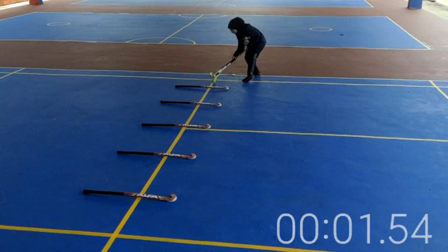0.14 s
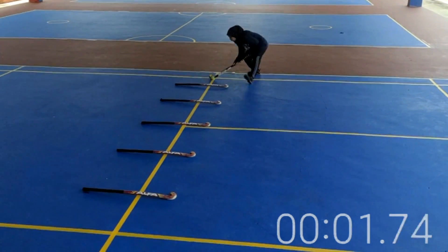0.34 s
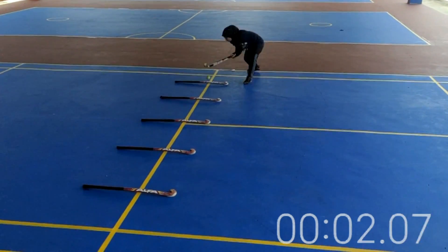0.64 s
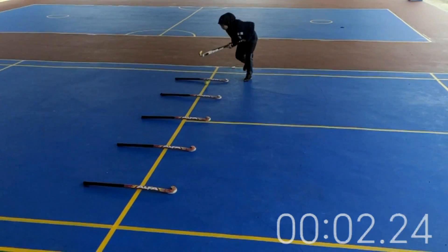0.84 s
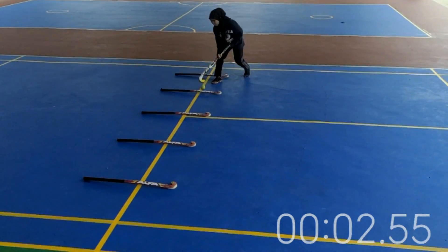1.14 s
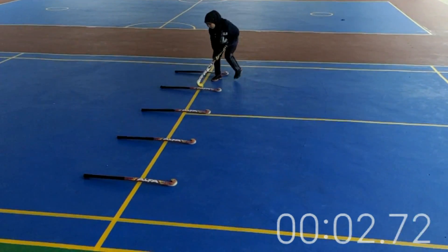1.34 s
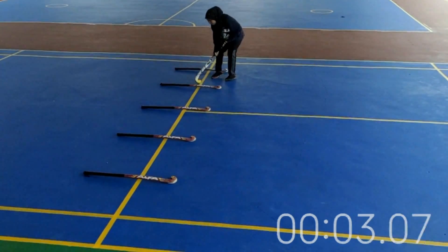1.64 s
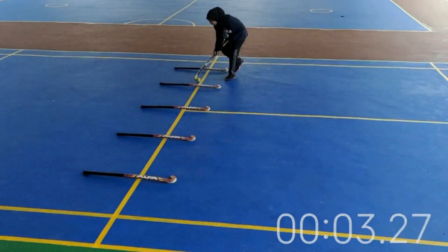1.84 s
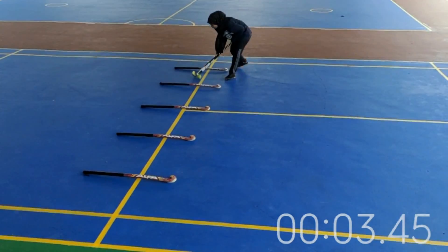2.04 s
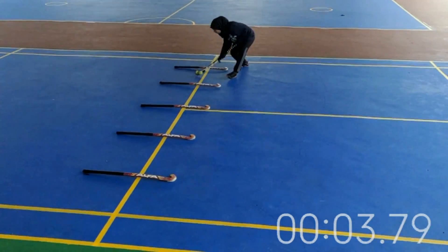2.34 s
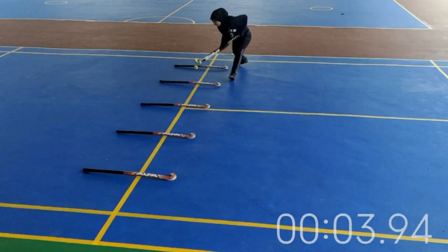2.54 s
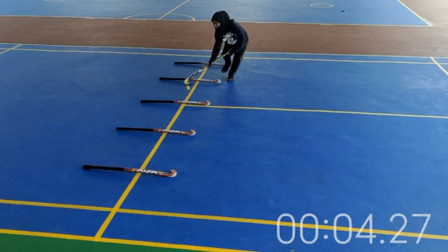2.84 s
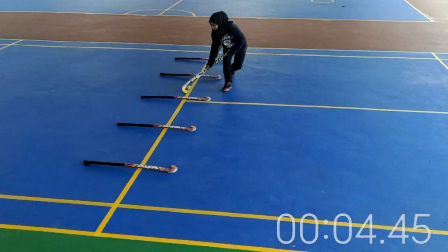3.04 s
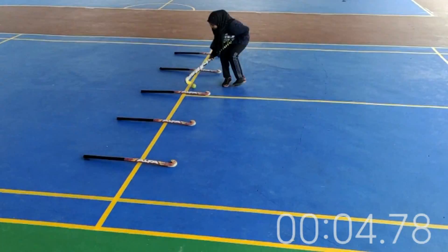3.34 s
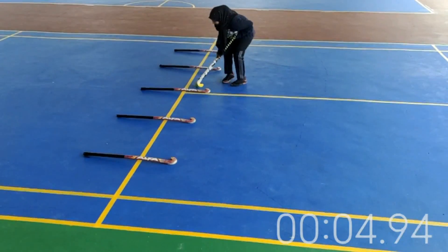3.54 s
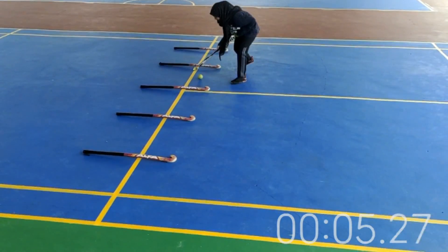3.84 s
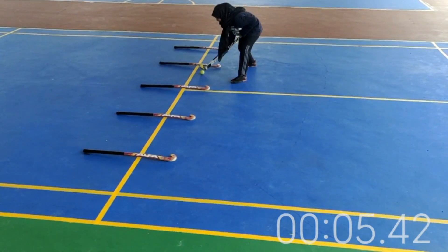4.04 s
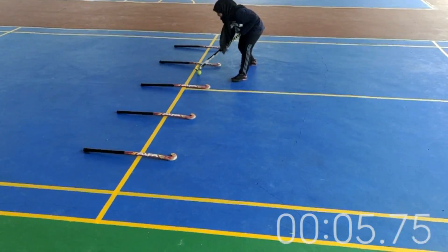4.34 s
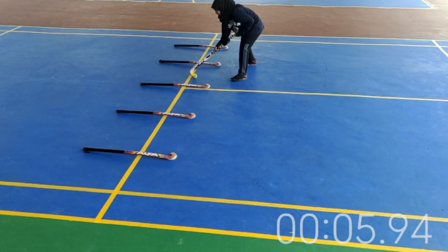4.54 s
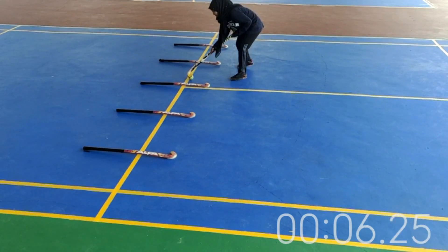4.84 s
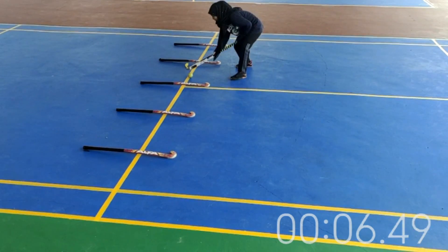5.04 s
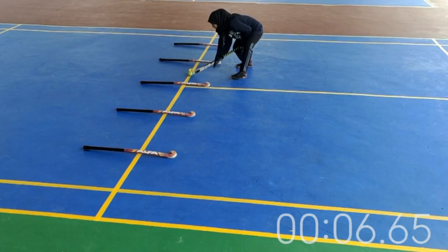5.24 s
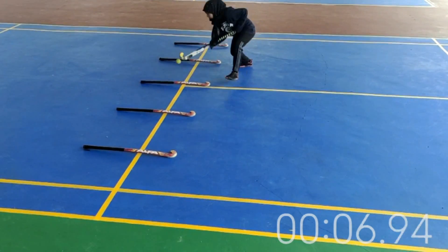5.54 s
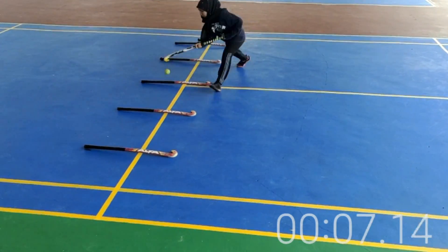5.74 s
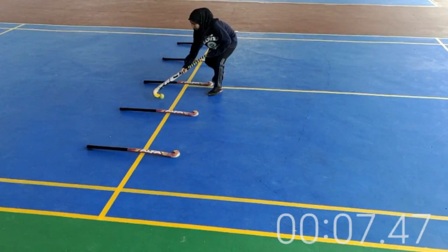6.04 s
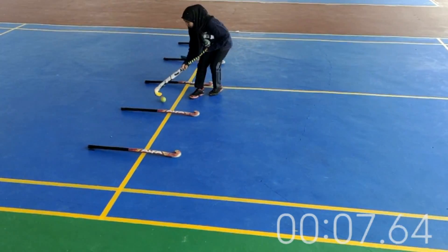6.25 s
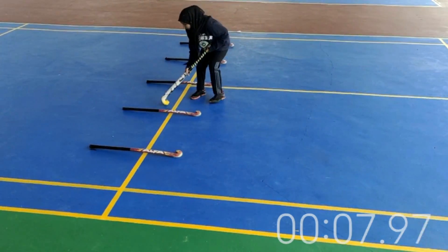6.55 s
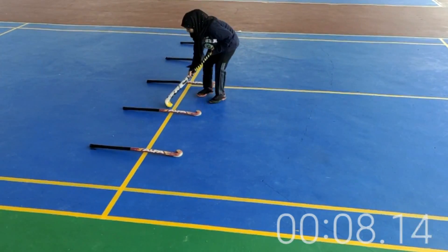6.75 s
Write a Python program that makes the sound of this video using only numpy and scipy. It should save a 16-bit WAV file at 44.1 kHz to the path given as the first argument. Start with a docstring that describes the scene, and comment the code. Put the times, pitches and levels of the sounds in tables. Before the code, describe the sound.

A hockey stick knocks a hard ball in uneven, ringing clacks over hollow thuds, echoing through a large hard-floored covered court with faint shoe squeaks.

```python
"""A hockey stick dribbles a hard ball across a covered court: ringing clacks over hollow thuds.
Each knock is a resonant spectrum turned into a causal ring, driven by a push and a few ms of chatter.
Knocks and footfalls slap back from roof and walls, then die away in a diffuse hall of decaying noise.
Soles scuff (coloured noise) and squeak (gliding sines) over a steady rumble of shaped noise and a hum."""
import sys
import numpy as np
from scipy import signal
from scipy.fft import rfft, irfft, next_fast_len
from scipy.io import wavfile
from scipy.ndimage import uniform_filter1d

SR = 44100
rng = np.random.default_rng(int(sys.argv[2]) if len(sys.argv) > 2 else 0)


def log_audio(samples):
    """Write samples as a 16-bit WAV file to the path given in sys.argv[1]."""
    # one column per channel
    frames = np.atleast_2d(samples).T
    # limit to full scale, then quantise
    limited = np.clip(frames, -1, 1)
    pcm = np.round(limited * 32767).astype(np.int16)
    wavfile.write(sys.argv[1], SR, pcm)


N = 303849


def gain_of(db):
    """Decibels to amplitude."""
    return 10 ** (np.asarray(db) / 20)


def evened(x):
    """Scales to rms 1."""
    return x / np.sqrt(np.mean(x ** 2) + 1e-20)


def read(points, hz):
    """Interpolates (Hz, value) rows on a log-frequency axis."""
    point_hz, value = np.transpose(points)
    return np.interp(np.log(hz + 1), np.log(point_hz + 1), value)


def add(mix, start_s, sound):
    """Mixes a sound in at start_s, cutting what falls outside."""
    at = round(start_s * SR)
    sound = sound[..., max(-at, 0):]
    part = mix[..., max(at, 0):][..., :sound.shape[-1]]
    part += sound[..., :part.shape[-1]]


def coloured(x, points):
    """Filters by a (Hz, dB) curve, zero phase."""
    length = x.shape[-1]
    size = next_fast_len(length)
    gain = gain_of(read(points, np.fft.rfftfreq(size, 1 / SR)))
    return irfft(rfft(x, size) * gain, size)[..., :length]


def panned(left_minus_right_db):
    """Left and right gains for a level difference."""
    return gain_of([[left_minus_right_db / 2], [-left_minus_right_db / 2]])


def ringing(db):
    """Minimum-phase response with this spectrum: a sharp start, then each peak rings out."""
    log_gain = np.log(gain_of(np.concatenate([db, db[-2:0:-1]])))
    return np.fft.ifft(np.exp(np.conj(signal.hilbert(log_gain)))).real


def softened_db(hz, hard_hz):
    """A contact of finite length loses the treble above its hardness."""
    return -10 * np.log10(1 + (hz / hard_hz) ** 4)


def diffuse(size):
    """Noise from all around: alike at both microphones in the bass, unrelated in the treble."""
    # likeness of the two microphones: freq_hz, correlation
    likeness = [(100, 0.91), (300, 0.85), (600, 0.69), (1000, 0.33), (2000, 0), (8000, 0)]
    a, b = rfft(rng.standard_normal((2, size)))
    same = np.clip(read(likeness, np.fft.rfftfreq(size, 1 / SR)), -1, 1)
    return irfft(np.array([a, same * a + np.sqrt(1 - same ** 2) * b]), size)


def scatter(decay_s, size=1024):
    """A brief spray of reflections, energy 1 per channel, that leaves the colour nearly even."""
    z = rfft(diffuse(size) * np.exp(-np.arange(size) / SR / decay_s))
    local_power = uniform_filter1d(abs(z) ** 2, size=15, axis=1)
    spray = irfft(z / np.sqrt(local_power), size)
    return spray / np.linalg.norm(spray, axis=1, keepdims=True)


def hall(onset_s=0.014, build_s=0.015, lumps_db=1.5, size=65536):
    """Diffuse tail: builds up after the roof echo, then each band dies at its own speed."""
    # decay of the hall: freq_hz, t60_s
    decay = [(150, 2.84), (500, 2.66), (1000, 1.88), (2000, 1.514), (3000, 1.724), (5000, 1.33),
             (8000, 1.143), (9800, 0.79), (13000, 0.83)]
    hz, t, z = signal.stft(diffuse(size), SR, nperseg=256)
    # reflections arrive in clusters
    lumps = uniform_filter1d(rng.standard_normal(z.shape[1:]), size=5, axis=1)
    lumps = evened(uniform_filter1d(lumps, size=24, axis=0))
    z = z * gain_of(lumps_db * lumps - 60 * t / read(decay, hz)[:, None])
    late_s = np.maximum(np.arange(size) / SR - onset_s, 0)
    build = 1.05 - np.exp(-late_s / build_s)
    tail = signal.istft(z, SR, nperseg=256)[1][:, :size] * build
    return tail / np.linalg.norm(tail[0])  # left channel at energy 1


def blow(colour_db, ring, edge, valley_db=-14):
    """One contact: the resonances of stick and ball stand out of its broad colour."""
    # resonances: freq_hz, width_hz, flat_face_db, edge_db
    resonances = [(529, 190, -8.5, -6), (890, 79, -10, -4.5), (990, 35, -2, -9), (1318, 67, -19, 0),
                  (1460, 40, 0.5, -18), (1770, 60, -18, -3.5), (1941, 68, -3.5, -22), (2446, 44, -5.5, 2.5),
                  (2509, 20, -3, 1), (3070, 74, -29.5, 4), (3610, 160, 1, -3), (4036, 69, 0.5, -11),
                  (4207, 43, 3, -17.5), (4350, 47, -9.5, -13), (4800, 100, -10.5, -11),
                  (6730, 630, 9, -4.5), (7400, 510, 12, -8)]
    hz = np.linspace(0, SR / 2, len(colour_db))
    edge = np.clip(edge, 0, 1)
    peaks = 0
    for freq_hz, width_hz, face_db, edge_db in resonances:
        strength = (1 - edge) * gain_of(face_db) ** 2 + edge * gain_of(edge_db) ** 2
        peaks = peaks + strength / (1 + (2 * (hz - freq_hz) / width_hz) ** 2)
    power = (peaks + gain_of(valley_db) ** 2) ** ring
    power = power / uniform_filter1d(power, size=90)  # peaks gather energy without adding any
    return ringing(colour_db + 10 * np.log10(power))


def stick_knocks(size=4096):
    """Stick on ball: clack and thud sum in power, and the ring deepens with the stick's share."""
    # knocks: start_s, clack_db, thud_db, hardness_hz, clack_pitch_hz, fizz_db,
    #   edge (0 flat face, 1 edge), early_echo_db, hall_db, thrown_treble_db
    strikes = [(-.25, 3, -4.5, 5000, 1700, 4, 0.5, 0, 3, 1.5),
               (.2776, 3, -13, 5300, 1700, -13, 0.43, 3.5, 3, 2),
               (1.144, 2.5, -1.5, 4540, 1500, -1.5, 0.65, 1, -0.5, 5),
               (1.7149, -7, -8.5, 4440, 1510, 5.5, 0.69, 1, -2, 6.5),
               (1.9864, -8.5, -13.5, 1980, 1700, 10.5, 0.18, 6.5, 3, -1.5),
               (2.1467, -12.5, -19, 3160, 1660, 4, .28, 8, 4, -3.5),
               (2.7441, -10, -3, 13800, 985, -1, 0.25, 1.5, -1.5, 4.5),
               (2.8218, -1.5, -4.5, 5600, 1750, 2.5, 1, 1.5, 1, 2.5),
               (2.9181, 14, 0.5, 2700, 2030, 0, 0.94, 1, -4.5, 8),
               (3.5233, 1.5, -4, 2430, 2080, 5, 0.092, 5, -1.5, 1),
               (4.0349, 3, -8.5, 2750, 2830, -7, .7, 4.5, 2.5, -4),
               (4.1031, 1.5, -1, 6200, 3920, 8, 0.17, -0.5, -5.5, -3),
               (4.6, -13.5, -20, 1400, 1400, -1, .7, -2, -4.5, 12.5),
               (5.1597, 4.5, -10.5, 3830, 2270, 3.5, 0.091, 8, 4.5, 3.5),
               (5.8155, -6, 1.5, 10200, 1700, 0.5, .4, -14, -2, 4),
               (5.851, 4, -4, 5900, 1530, 3, 0.16, 0, -1, 1.5),
               (6.673, -4.5, -4.5, 3000, 1400, 4, 0.13, 2, -3, 5.5)]
    # broad colour of the clack: freq_hz, gain_db
    clack_colour = [(30, -55), (450, -33), (930, -7.5), (1650, -3.5), (3100, -8.5), (5100, -6.5),
                    (7300, -2), (8300, 0.5), (9700, -11.5), (13500, -16), (16000, -31)]
    # broad colour of the thud: freq_hz, gain_db
    thud_colour = [(30, -38), (180, -8), (450, -3), (930, 5.5), (1650, -4), (3100, -44), (5100, -20.5),
                   (8300, -20), (9700, -43), (16000, -71)]
    focus_peak_db, focus_octaves, fizz_above_hz = 7, 0.73, 8980
    ring_ball, ring_stick, ring_sweet, sweet_width = 0.15, 1, 1, 0.14  # exponents; width in edge units
    hz = np.fft.rfftfreq(size, 1 / SR)
    for start_s, stick_db, ball_db, hard_hz, pitch_hz, fizz_db, edge, *room_db in strikes:
        octaves = np.log2((hz + 1) / pitch_hz)
        focus_db = focus_peak_db * np.exp(-(octaves / focus_octaves) ** 2)
        top_db = fizz_db * (1 - 1 / (1 + (hz / fizz_above_hz) ** 20))
        clack_db = stick_db + read(clack_colour, hz) + softened_db(hz, hard_hz) + focus_db + top_db
        clack = gain_of(clack_db)
        thud = gain_of(ball_db + read(thud_colour, hz))
        stick_share = 1 / (1 + gain_of(ball_db - stick_db) ** 2)
        ring = ring_ball + (ring_stick - ring_ball) * stick_share
        ring = ring + ring_sweet * np.exp(-abs(edge) / sweet_width)  # sweet spot of the flat face
        sound = blow(20 * np.log10(np.hypot(clack, thud)), ring, edge)
        yield start_s, sound, hard_hz, *room_db


def rumble(level_db=-64.5):
    """The hall's steady low rumble: diffuse noise, mostly bass."""
    # background colour, relative: freq_hz, density_db_per_hz
    air = [(20, -22), (45, -9), (70, -6), (100, 5.5), (150, 5.5), (250, 1), (450, -7), (800, -4.5),
           (1500, -15), (2200, -5), (3200, -78), (6000, -56), (9000, -58), (15000, -68)]
    return gain_of(level_db) * evened(coloured(diffuse(next_fast_len(N)), air))[:, :N]


def mains_hum(freq_hz=100, level_db=-79):
    """A faint steady sine, equal on both sides."""
    return gain_of(level_db) * evened(np.sin(2 * np.pi * freq_hz * np.arange(N) / SR))


def footfalls(size=4096):
    """Feet landing: a short coloured thump, softened by the length of the contact."""
    # landings: start_s, level_db, hardness_hz
    steps = [(0.2258, -11, 12000), (0.694, -7, 8400), (.8313, -14, 9900), (5.659, -12.5, 3500)]
    # broad colour of a footfall: freq_hz, gain_db
    footfall_colour = [(30, -28), (180, -10.5), (450, 1.5), (930, 0.5), (1650, -7), (3100, -12),
                       (5100, -18.5), (8000, -9), (10000, -26), (16000, -34)]
    early_db, hall_db, treble_db = -2, -1.5, 2
    hz = np.fft.rfftfreq(size, 1 / SR)
    for start_s, level_db, hard_hz in steps:
        sound = ringing(level_db + read(footfall_colour, hz) + softened_db(hz, hard_hz))
        yield start_s, sound, hard_hz, early_db, hall_db, treble_db


def contact(hard_hz, chatter_s=0.0048, push_hz=3800, bounce_s=.0027, bounce=0.31):
    """A push, then a few ms of rattling and a small bounce; harder contacts are mostly clean push."""
    chatter_soft, clean_hz = 0.81, 7910
    chatter = np.clip(chatter_soft / (1 + (hard_hz / clean_hz) ** 2), 0, .95)
    push = np.exp(-2 * np.pi * push_hz * np.arange(32) / SR)
    push = push / push.sum()
    force = np.sqrt(chatter) * scatter(chatter_s)
    add(force, 0, np.sqrt(1 - chatter) * push)
    add(force, bounce_s, bounce * chatter * push)
    return force


def early_echoes(start_s, early_db, size):
    """Smeared echoes from walls and roof; the nearer the player, the later they follow."""
    # early echoes before the lag: delay_s, level_db, smear_s
    echoes = [(.0140, -36, .001), (.0228, -15, 0.0024), (.0252, -10.5, 0.0015), (.0335, -13, .003),
              (.0382, -16, 0.0011)]
    lag_s = -0.001097 + 0.00038 * start_s  # grows through the scene
    early = np.zeros((2, size))
    for delay_s, level_db, smear_s in echoes:
        add(early, delay_s + lag_s, gain_of(level_db + early_db) * scatter(smear_s))
    return coloured(early, [(1800, 0.0043), (6000, -4)])  # Hz, dB


def wall_slap(start_s, early_db, size):
    """One coloured wall echo, right of centre, that strengthens through the scene."""
    # wall colour: freq_hz, gain_db
    wall_colour = [(300, -14.5), (930, -10.5), (1550, -1), (3100, -14), (5100, -21), (12000, -21)]
    delay_s, smear_s, start_db, rise_db_per_s, pan_db = .0373, 0.0037, -17, 3, -3.5
    early_share = .25  # how far it follows the strength of the early echoes
    wall = np.zeros((2, size))
    level_db = start_db + rise_db_per_s * start_s + early_db * early_share
    add(wall, delay_s, gain_of(level_db) * scatter(smear_s))
    return coloured(wall, wall_colour) * panned(pan_db)


def impacts_in_hall(tail_db=-1):
    """Every knock and footfall arrives directly, then as early echoes, then as the hall's tail."""
    # player's place, right of centre and furthest at the end: time_s, left_minus_right_db
    player_pan = [(0, -1.5), (5.2, -2.5), (5.8, -1.5), (6.9, -4)]
    out = np.zeros((2, N))
    sends = np.zeros((3, SR + N))  # 1 s of lead-in: the hall already rings at the start
    impacts = [*stick_knocks(), *footfalls()]
    for k, (start_s, sound, hard_hz, early_db, hall_db, treble_db) in enumerate(impacts):
        # treble is thrown unevenly, towards the hall or towards the microphones
        throw_db = read([(1400, 0), (3500, treble_db)], np.fft.rfftfreq(256, 1 / SR))
        thrown = signal.fftconvolve(sound, ringing(throw_db))
        early = early_echoes(start_s, early_db, len(sound))
        wall = wall_slap(start_s, early_db, len(sound))
        direct = contact(hard_hz) * panned(np.interp(start_s, *np.transpose(player_pan)))
        for path, source in (direct, sound), (early, thrown), (wall, thrown):
            add(out, start_s, signal.fftconvolve(path, source[None], axes=1))
        add(sends[k % len(sends)], start_s + 1, gain_of(hall_db) * thrown)  # three tails in turn
    tails = sum(signal.fftconvolve(send[None], hall(), axes=1)[:, SR:SR + N] for send in sends)
    return out + gain_of(tail_db) * tails


def scuffs(grain=0.37):
    """Soles hiss as they slide: gritty coloured noise under a smooth swell."""
    # slides, levels ahead of the path gains: centre_s, length_s, level_db
    slides = [(1.075, 0.049, -73), (2.499, 0.07, -60), (3.336, 0.066, -54.5), (4.844, 0.16, -69),
              (5.77, 0.046, -72), (6.468, 0.066, -67.5)]
    # colour of a slide, relative: freq_hz, gain_db
    slide_colour = [(300, -21), (2300, 7), (2850, 14.5), (3400, -16), (5000, 5.5), (8300, 12), (10000, 0),
                    (14000, -8), (16000, -31)]
    out = np.zeros(N)
    for centre_s, length_s, level_db in slides:
        size = int(length_s * SR)
        grit = rng.standard_normal(size) * np.exp(grain * rng.standard_normal(size))
        hiss = evened(coloured(grit, slide_colour)) * np.hanning(size)
        add(out, centre_s - length_s / 2, gain_of(level_db) * hiss)
    return out


def squeaks(waver=0.022):
    """Faint squeaks where the rubber grips: gliding sines with a wavering pitch."""
    # squeaks, levels ahead of the path gains: start_s, length_s, start_hz, end_hz, peak_db
    chirps = [(1.838, 0.036, 2110, 2050, -67), (4.73, 0.077, 2100, 1944, -62),
              (4.815, 0.12, 2430, 2304, -59.5), (4.902, 0.038, 2120, 2270, -58),
              (5.037, 0.093, 1824, 1543, -60.5), (5.118, 0.077, 2340, 2515, -59)]
    out = np.zeros(N)
    for start_s, length_s, start_hz, end_hz, peak_db in chirps:
        size = int(length_s * SR)
        wobble = evened(uniform_filter1d(rng.standard_normal(size), size=120))
        pitch_hz = np.linspace(start_hz, end_hz, size) * (1 + waver * wobble)
        tone = np.sin(2 * np.pi * np.cumsum(pitch_hz) / SR)
        add(out, start_s, gain_of(peak_db) * tone * np.hanning(size))
    return out


def shoes(direct_db=-2, wet_db=-2):
    """Scuffs and squeaks, heard directly and through the hall."""
    soles = scuffs() + squeaks()
    tail = signal.fftconvolve(soles[None], hall(), axes=1)[:, :N]
    return gain_of(direct_db) * soles + gain_of(wet_db) * tail


def scene():
    """Knocks and footfalls, background and shoes together."""
    return impacts_in_hall() + rumble() + mains_hum() + shoes()


def suppress(x, depth_db=8, knee_db=1.0):
    """Noise reduction: bands that sink under the quiet level are turned down further."""
    # quiet level: freq_hz, threshold_db_per_bin
    quiet = [(200, -110), (450, -83), (1000, -79.5), (2000, -91), (3000, -85.5), (4200, -90.5),
             (6000, -92.5), (8500, -91), (10000, -107.5), (15000, -101)]
    hz, t, z = signal.stft(x, SR, nperseg=1024, noverlap=768)
    power = (abs(z) ** 2).mean(0)
    power = uniform_filter1d(uniform_filter1d(power, size=7, axis=0), size=7, axis=1)
    over_db = 10 * np.log10(abs(power) + 1e-16) - read(quiet, hz)[:, None]
    cut_db = depth_db * (1 - np.tanh(over_db / knee_db)) / 2
    return signal.istft(z * gain_of(-cut_db), SR, nperseg=1024, noverlap=768)[1][:, :N]


def record(dry):
    """Each microphone has its own colour; then noise reduction and the band limit."""
    # tilt between the microphones: freq_hz, left_minus_right_db
    balance = [(100, 0), (450, 1), (800, -0.5), (1200, -3), (1700, -5), (2100, -6.5), (2700, 6.5),
               (4200, 0.5), (6200, 2), (8000, 5), (9800, -6.5), (12000, 7)]
    band_limit_hz = 15700
    sides = []
    for x, side in zip(dry, (1, -1)):
        sides.append(coloured(x, [(hz, side * db / 2) for hz, db in balance]))
    lowpass = signal.firwin(511, band_limit_hz, window=("kaiser", 9), fs=SR)
    return signal.oaconvolve(suppress(np.array(sides)), lowpass[None], "same", axes=1)


dry = scene()
out = record(dry)
log_audio(out)
```